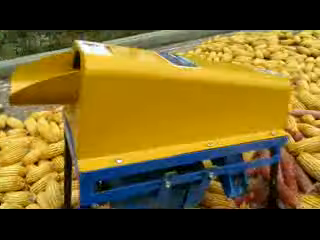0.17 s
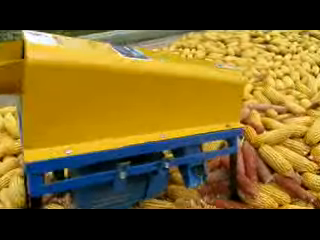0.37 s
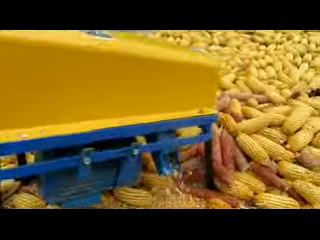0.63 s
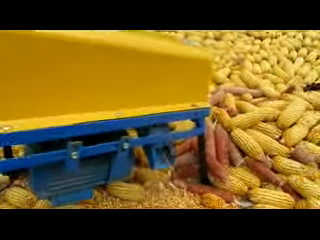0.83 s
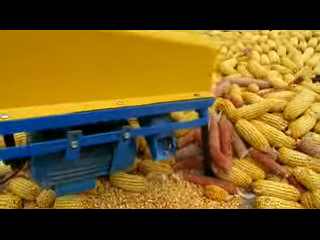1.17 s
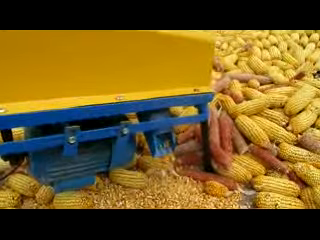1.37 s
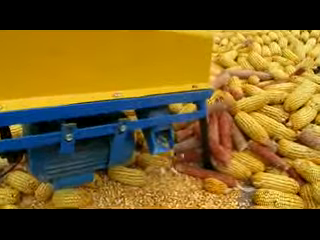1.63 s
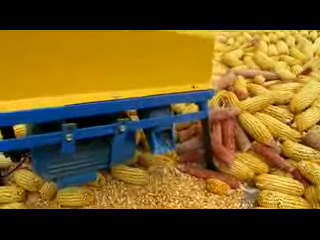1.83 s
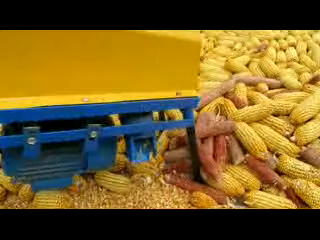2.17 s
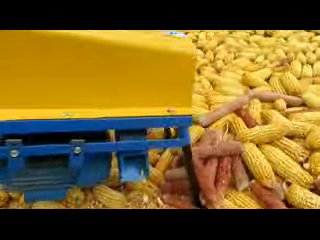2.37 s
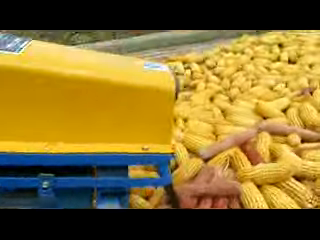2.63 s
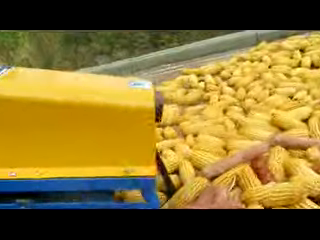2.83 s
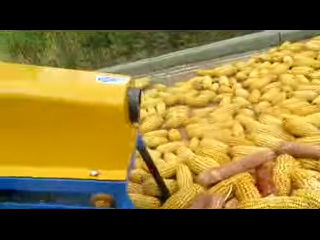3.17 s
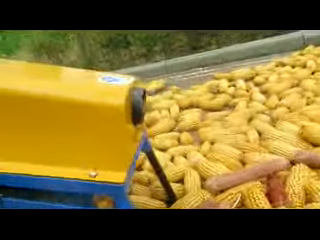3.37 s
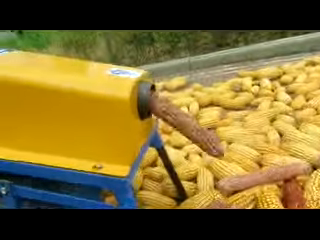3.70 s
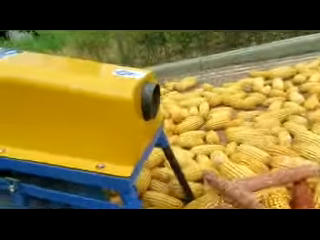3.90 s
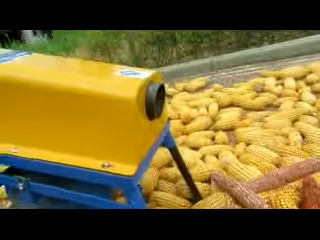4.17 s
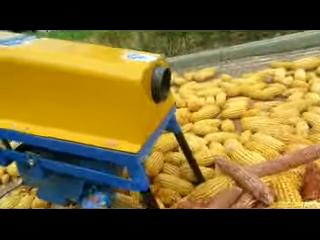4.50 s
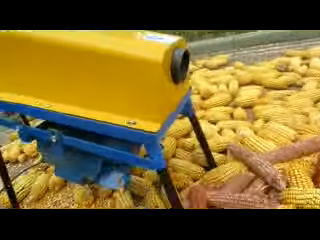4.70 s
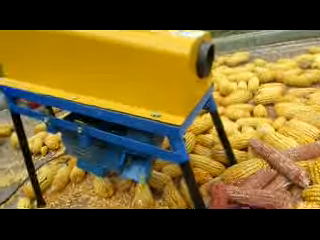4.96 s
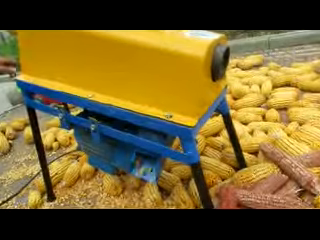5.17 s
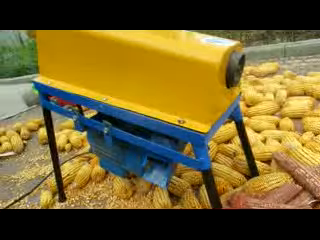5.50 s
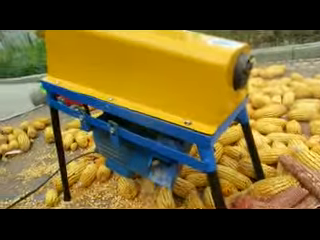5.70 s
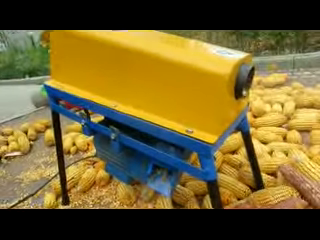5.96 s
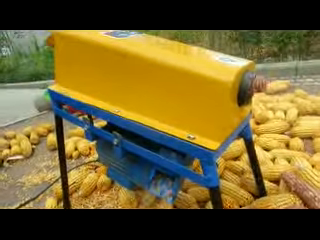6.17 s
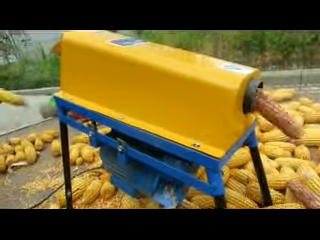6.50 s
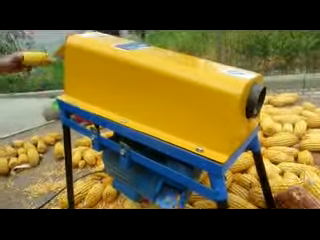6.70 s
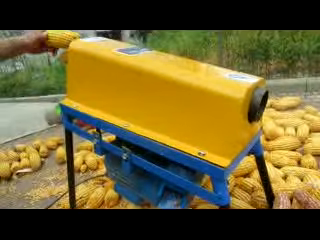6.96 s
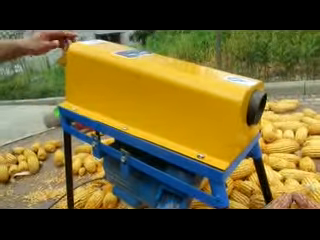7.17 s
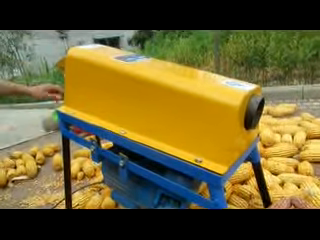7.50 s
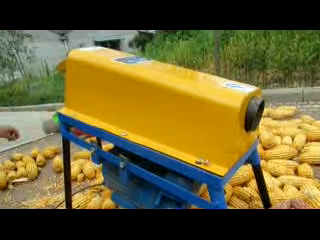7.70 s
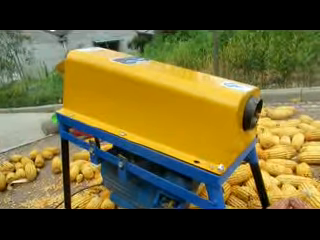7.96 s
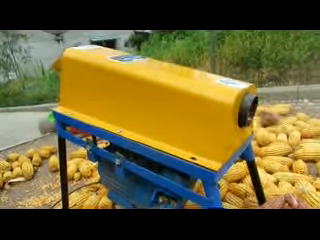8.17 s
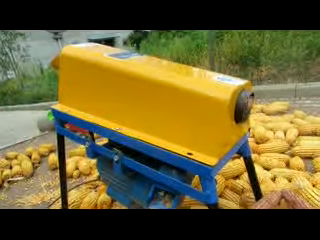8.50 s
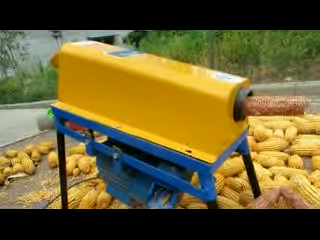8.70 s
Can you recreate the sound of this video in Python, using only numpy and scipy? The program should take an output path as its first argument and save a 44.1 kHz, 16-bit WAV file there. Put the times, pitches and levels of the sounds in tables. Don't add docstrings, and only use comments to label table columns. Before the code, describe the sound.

Close outdoors, a corn-shelling machine grinds cobs in bursts of distorted, gliding rasp, with rattling kernels and ringing hood knocks in the gaps between.

```python
import sys
import numpy as np
from scipy import signal
from scipy.fft import rfft, irfft
from scipy.io import wavfile
from scipy.ndimage import uniform_filter1d, minimum_filter1d

SR = 44100
rng = np.random.default_rng(int(sys.argv[2]) if len(sys.argv) > 2 else 0)


def to_wav(s):
    ch = np.atleast_2d(s).T
    pcm = np.round(np.clip(ch, -1, 1) * 32767)
    wavfile.write(sys.argv[1], SR, pcm.astype(np.int16))


def gain_from_db(level_db):
    decades = np.asarray(level_db, float) / 20
    return 10 ** decades


N = 389844

# entry t/s, exit t/s, full wrap rate re 1 kHz level/dB, stripped wrap rate level/dB,
# rasp level/dB
COBS = [
    (-.6, 0.146, 11, 10.5, -10),
    (.173, 1.96, 11, 5, -10.5),
    (2.909, 4.33, 11.5, 7, -10.5),
    (5.3, 6.98, 12, 2.5, -9),
    (7.12, 7.208, 15, .5, -10.5),
    (7.741, 9.2, 11, 4, -8),
]
GRIP_SHARE, GRIP_DB, STRIP_POWER = 0.0502, -1.5, 3.0
LEVEL_PER_RATE, RATTLE_DB, RATTLE_PER_RATE = -0.29, -35, 1.416
# start t/s, end t/s
OVERLOADS = [(0, .137), (.173, 1.677), (1.683, 1.908), (1.913, 1.954), (2.909, 4.329), (5.3, 5.368),
             (5.373, 6.622), (6.626, 6.721), (6.727, 6.925), (6.932, 6.975), (7.184, 7.219), (7.741, 8.85)]
# t/s, half length t/s, wrap rate change level/dB, rasp change level/dB
SLIPS = [(.04, .035, -4, -.5), (.106, .012, -3.5, -1), (.137, .008, -4, -3.5), (.465, .02, -2.5, -.5),
         (.621, .045, -2.5, -0.5), (.88, .1, -1.26, 0), (1.066, .025, -1, -0.5), (1.223, .06, 1.5, 0),
         (1.464, .04, -1.32, 0), (1.55, .06, 1.26, 0.5), (1.779, 0.031, -5, -3), (1.849, .012, 2.5, -5),
         (1.886, .015, -4, 1), (1.92, .012, 5, 1.5), (3.553, 0.039, -3, 0), (3.645, .025, -1.5, -0.5),
         (3.945, 0.036, -2.5, -0.5), (4.329, .04, -5.5, -3), (5.355, .025, -4.5, 0), (6.26, .03, -1.5, 0),
         (4.04, .07, -1.28, -0.5), (6.57, 0.041, 1.5, 0), (6.64, 0.043, -2, -1.5), (6.72, .015, -4, -0.5),
         (6.809, 0.039, 0.73, -1), (6.868, .016, -4, -1), (6.902, .01, -2.5, -7.5), (6.973, .015, 1, -10),
         (7.772, .03, -3.5, -0.5), (8.68, .1, -1.5, 0)]
# t/s, peak level/dB, jump in pounding level/dB
BITES = [(1.7594, -12, 3), (1.7907, -7, 3), (1.812, -8, 3), (1.8313, -7, 3), (1.8482, -1, 3),
         (4.2504, -1, 3), (4.2895, -13, 3), (4.3112, -7, 3), (4.3254, -6, 3.5), (6.6444, -1, 3),
         (6.692, -1, 4.5), (6.7446, -4, 5.5), (6.7643, 1, 3), (6.7935, 1, 3), (6.8096, 0, 2.5),
         (6.8823, -6, 7), (6.9127, -8, 6), (6.933, -6, 6), (6.9711, -7, 7), (7.184, 0, 4.5), (7.7408, 1, 4)]
# t/s, rattle level/dB
FLOW = [
    [(.143, -31.5), (.167, -22)],
    [(1.968, -28.5), (2.33, -36.5), (2.57, -40), (2.588, -25.5), (2.67, -31), (2.68, -24), (2.798, -27),
     (2.84, -20.5), (2.9, -17.5)],
    [(4.342, -22.5), (4.376, -28), (4.532, -23.5), (4.848, -29), (4.856, -40), (4.97, -37), (5.04, -34),
     (5.162, -33), (5.29, -22)],
    [(6.99, -31), (7.052, -33), (7.138, -30), (7.172, -43)],
    [(7.235, -44), (7.249, -34), (7.343, -47), (7.385, -51), (7.529, -33), (7.609, -24), (7.631, -38),
     (7.645, -28), (7.73, -19.5)],
]
# idle hood boom level/dB, boom re rattle at start and end level/dB,
# frame re boom at start and end level/dB
PAUSES = [
    (-33, -10, -10.5, -10, -4),
    (-39, -15, -4.5, -13, 0.5),
    (-37, -8.5, -8, -17.5, -8.5),
    (-41, -7, -7, -12, -14),
    (-40.5, -30, -7.5, -9, -2.5),
]
# f/Hz, level/dB per Hz
KERNEL_SPECTRUM = [(710, -39), (1200, -7), (1320, -7), (1420, -6.5), (1540, -5.5), (1870, -5), (2330, -5),
                   (2900, -3.5), (4470, -4), (4720, -3), (8200, -4), (9580, -7), (10800, -13), (14000, -40),
                   (22000, -120)]
# f/Hz, width f/Hz, level/dB
PANEL_MODES = [(2380, 91, -11), (3000, 30, -15), (4540, 39, -36), (5700, 21, -62), (6760, 41, -35)]
# t/s, peak level/dB, share of the boom band level/dB
THROWS = [(2.0877, -52, -30), (2.3514, -15, -17), (2.4204, -16.5, -20), (2.4544, -25, 17), (2.578, -15, 14),
          (2.681, -6.5, 19), (2.8185, -18, 22), (4.4152, -13.5, -23), (4.4694, -26, 2), (4.5194, -19, 17),
          (4.586, -23, -32), (4.628, -8, -24), (4.787, -10.5, -9), (4.881, -14, -34), (4.9222, -17, -20),
          (4.959, -10.5, -20), (5.03, -11, -28), (5.1043, -14.5, -37), (5.1744, -5.5, -1),
          (5.248, -13, -41), (7.016, -14.5, -21), (7.0757, -11.5, -28), (7.2812, -24, -19),
          (7.3223, -16, -21), (7.4093, -20, -11), (7.478, -13.5, 8), (7.5986, -38, -17), (7.676, -12, -24)]
# f/Hz, width f/Hz, level/dB
HOOD_MODES = [(632, 53, 2), (812, 110, -6), (985, 86, -4.5), (1130, 8.6, 2.5), (1174, 42, -10),
              (1312, 17, 3)]
# f/Hz, width f/Hz, level/dB
FRAME_MODES = [(100, 17, -9), (165, 61, -7.5), (258, 23, 1), (306, 42, -0.5), (414, 100, -1.5)]
# f/Hz, width f/Hz, level/dB
MOTOR_MODES = [(101, 14, -4), (152.85, 26, 0), (200, 20, -7)]
MOTOR_DB = -59.5
# t/s, peak level/dB, f/Hz, ring below peak level/dB
PINGS = [(2.029, -22, 1890, -7), (2.577, -16, 1000, -8), (2.677, -2, 999, -13), (2.712, -5, 985, -12),
         (2.832, -5, 813, -9), (4.507, -10, 820, -10), (4.559, -14, 2380, -6), (4.599, -13, 986, -10),
         (4.659, -11, 2370, -7), (4.791, -7, 2390, -9), (4.829, -17, 3340, -10), (5.174, -6.5, 2240, -9.5),
         (5.189, -11, 985, -2.5), (7.599, -17, 3430, -12)]
# t/s, length t/s, f/Hz, level/dB
WHISTLES = [
    (3.381, 0.037, 6960, -2.5),
    (4.55, 0.021, 6900, 0.5),
    (4.576, .008, 6950, -16),
]
# f/Hz, side re mid level/dB
WIDTH = [(60, -17), (110, -17), (190, -12), (340, -14.5), (600, -12.5), (1070, -19), (1900, -26.5),
         (3380, -23), (6010, -15), (10700, -9.5)]
TOP_HZ = 11000


def unit(x):
    return x / np.sqrt(np.mean(x ** 2))


def curve(table, off=-90):
    s, *columns = np.transpose(table)
    t = np.arange(N) / SR
    return np.array([np.interp(t, s, c, left=off, right=off) for c in columns])


def colour(x, points):
    hz, db = np.transpose(points)
    f = np.maximum(np.fft.rfftfreq(N, 1 / SR), 1)
    gain = gain_from_db(np.interp(np.log(f), np.log(hz), db))
    return irfft(rfft(x) * gain, N)


def ring(x, modes):
    total = 0
    for k, (hz, width, db) in enumerate(modes):
        b, a = signal.iirpeak(hz, hz / width, fs=SR)
        total = total + (-1) ** k * gain_from_db(db) * signal.lfilter(b, a, x)
    return total


def walk(rate):
    hold = int(SR / rate)
    levels = np.repeat(rng.standard_normal(N // hold + 1), hold)
    return unit(uniform_filter1d(uniform_filter1d(levels, hold), hold)[:N])


def struck(times, sizes, fall_s):
    kicks = np.zeros(N)
    np.add.at(kicks, (np.asarray(times) * SR).astype(int), sizes)
    return signal.lfilter([1], [1, -np.exp(-1 / (fall_s * SR))], kicks)


def overload():
    t = np.arange(0, N + 64, 64) / SR
    rate_db, level_db = np.zeros((2, len(t)))
    for enters, leaves, full_db, stripped_db, db in COBS:
        u = np.clip((t - enters + .002) / (leaves - enters), 0, 1)
        grip_db = GRIP_DB * np.exp(-u / GRIP_SHARE)
        load_db = full_db + grip_db + (stripped_db - full_db) * u ** STRIP_POWER
        rate_db = np.where(u > 0, load_db, rate_db)
        level_db = np.where(u > 0, db - LEVEL_PER_RATE * full_db, level_db)
    for s, half, jam_db, drop_db in SLIPS:
        bump = np.exp(-((t - s) / half) ** 2)
        rate_db = rate_db + jam_db * bump
        level_db = level_db + drop_db * bump
    rasp_db = level_db + LEVEL_PER_RATE * rate_db
    rattle_db = RATTLE_DB + RATTLE_PER_RATE * rate_db
    fine = np.arange(N) / SR
    on = sum((fine >= a) & (fine <= b) for a, b in OVERLOADS) > 0
    return np.array([np.where(on, np.interp(fine, t, c), -90) for c in (rasp_db, rate_db, rattle_db)])


def pounding():
    return unit(ring(rng.standard_normal(N), [(55.07, 60, -1), (150.25, 140, -1), (499.2, 700, -11)]))


def rasp(rattle):
    level_db, rate_db, _ = overload()
    rate_db = np.maximum(rate_db, -3)
    bites = np.array(BITES)
    bite_db = struck(bites[:, 0], bites[:, 2], 0.01193)
    shaft, frame = pounding(), pounding()
    load = np.clip((rate_db - 3.5) / 5.5, 0, 1)
    pound = np.sign(shaft) * np.hypot(shaft, .9 * load * frame)
    effort = gain_from_db(1.25 * rate_db - 3.5 + bite_db + 0.5 * walk(30) + 1.1 * walk(300))
    wraps_hz = 1000 * effort * np.tanh(.55 * pound) * 2.1
    phase = 2 * np.pi * np.cumsum(wraps_hz) / SR + 2.76 * rattle
    folded = np.sin(phase) + 0.21 * np.sin(2 * phase) + 0.037 * np.sin(3 * phase)
    moving = np.tanh((uniform_filter1d(np.abs(wraps_hz), size=40) / 720) ** 4)
    steps = signal.lfilter(*signal.butter(2, 430, "high", fs=SR), folded * (0.15 + moving))
    steps = np.tanh(1.157 * signal.lfilter(*signal.butter(1, 8500, fs=SR), steps))
    steps = steps - ring(steps, [(472, 310, -7.0)])
    steps = signal.lfilter(*signal.butter(1, 130, "high", fs=SR), steps)
    steps = steps * uniform_filter1d(gain_from_db(level_db + 4.5), size=24)
    return steps + unwrapped(level_db, rate_db)


def unwrapped(level_db, rate_db):
    fade = np.exp(-1 / (0.0084 * SR))
    leak = signal.lfilter([1 - fade], [1, -fade], gain_from_db(level_db - 11.0 - 1.45 * rate_db))
    thump = unit(ring(rng.standard_normal(N), [(35, 150, -21), (255, 250, 8.5)]))
    thump = signal.lfilter(*signal.butter(1, 110, "high", fs=SR), thump)
    settle = np.exp(-1 / (0.022 * SR))
    deep = signal.lfilter([1 - settle], [1, -settle], gain_from_db(level_db - 20 - 2.8 * rate_db))
    shudder = deep * unit(ring(rng.standard_normal(N), [(38, 40, 0)]))
    return leak * thump + shudder


def between():
    rows = []
    for flow, (idle_db, *relative_db) in zip(FLOW, PAUSES):
        s, db = np.transpose(flow)
        ends = np.reshape(relative_db, (2, 2))
        below_db, frame_db = (np.interp(s, s[[0, -1]], pair) for pair in ends)
        boom_db = 10 * np.log10(gain_from_db(2 * idle_db) + gain_from_db(2 * (db + below_db)))
        rows.append(curve(np.transpose([s, boom_db, frame_db, db])))
    return -minimum_filter1d(-np.max(rows, axis=0), size=1200, axis=1)


def hail(rate, spread_db):
    when = rng.random(N) < rate / SR
    size = rng.exponential(size=N)
    decay = np.exp(-1 / (0.0036 * SR))
    energy = signal.lfilter([1], [1, -decay], when * gain_from_db(2 * spread_db * size))
    return unit(np.sqrt(energy + 0.057) * rng.standard_normal(N))


def throws(column_db, rise_s, fall_s):
    times = np.array(THROWS)[:, 0]
    onset_s = 1 / (1 / fall_s + 1 / rise_s)
    return struck(times, gain_from_db(column_db), fall_s) - struck(times, gain_from_db(column_db), onset_s)


def kernels():
    hits = hail(rate=2300.0, spread_db=1.5)
    tone = unit(colour(hits, KERNEL_SPECTRUM[:-2]))
    tone = unit(tone + 1.2 * ring(tone, PANEL_MODES))
    stream_db = np.maximum(overload()[2] + 4.2, between()[2] + 4.02)
    stream_db = -minimum_filter1d(-stream_db, size=420, origin=200)
    stream = gain_from_db(stream_db + 1.5 * walk(25))
    handfuls = gain_from_db(-7.5) * throws(np.array(THROWS)[:, 1], 0.0003, 0.036)
    return tone * (stream + handfuls)


def body():
    hood_db, frame_db, _ = between()
    shake = hail(rate=620.0, spread_db=-1.5)
    hood = unit(ring(ring(shake, HOOD_MODES), [(947, 330, 0)]))
    frame = unit(ring(ring(rng.standard_normal(N), FRAME_MODES), [(253, 340, 0)]))
    hum = unit(ring(ring(rng.standard_normal(N), MOTOR_MODES), [(102, 240, 0)]))
    _, peak_db, boom_share_db = np.transpose(THROWS)
    knocks = gain_from_db(-29) * throws(peak_db + boom_share_db, .003, 0.016)
    return hood * (gain_from_db(hood_db + 2.0) + knocks) + frame * gain_from_db(hood_db + frame_db) + gain_from_db(MOTOR_DB) * hum


def pings():
    out = np.zeros(N)
    age = np.arange(SR // 4) / SR
    envelope = np.minimum(age / 0.0065, 1) * np.exp(-age / 0.022)
    for s, db, hz, below in PINGS:
        out[int(s * SR):][:len(age)] += gain_from_db(db + below) * envelope * np.sin(2 * np.pi * hz * age)
    return gain_from_db(3.6 * walk(90)) * out


def whistle():
    t = np.arange(N) / SR
    total = np.zeros(N)
    for s, length, hz, db in WHISTLES:
        burst = np.exp(-np.abs((t - s) / (length / 2)) ** 2.64)
        total += gain_from_db(db) * burst * np.sin(2 * np.pi * hz * t)
    return total


def patchy(x, spread_db):
    z = signal.stft(x, nperseg=2048)[2]
    field = rng.standard_normal((z.shape[0] // 24 + 1, z.shape[1]))
    field = unit(uniform_filter1d(uniform_filter1d(field, size=4, axis=1), size=2, axis=0))
    level_db = spread_db * np.repeat(field, repeats=24, axis=0)[:len(z)]
    return signal.istft(z * gain_from_db(level_db), nperseg=2048)[1][:N]


def scene():
    rattle = kernels()
    high_pass = signal.butter(2, 90, "high", fs=SR, output="sos")
    machine = signal.sosfilt(high_pass, rattle + body() + pings())
    mid = rasp(rattle) + machine
    loudness = np.sqrt(uniform_filter1d((0.69 * mid) ** 2 + (1.45 * machine) ** 2, size=2048))
    late = np.roll(mid, shift=9001)
    other = late / np.sqrt(uniform_filter1d(late ** 2, size=2048)) * loudness
    side = gain_from_db(-3.0) * patchy(colour(other, WIDTH), spread_db=5.0) + whistle()
    return np.array([mid + side, mid - side])


def roll_off(x):
    return signal.sosfilt(signal.butter(12, 11280, fs=SR, output="sos"), x)


def record(dry):
    top_cut = signal.ellip(12, .2, 75, TOP_HZ, fs=SR, output="sos")
    mix = signal.sosfilt(top_cut, np.clip(dry, -.87, .87))
    return roll_off(mix)


dry = scene()
out = record(dry)
to_wav(out)
```